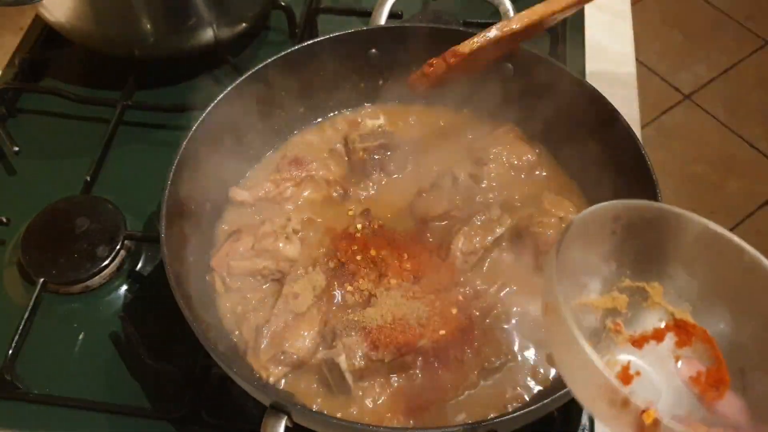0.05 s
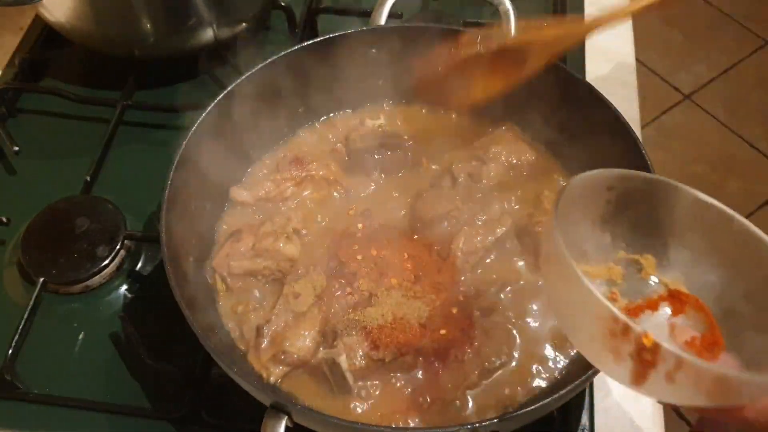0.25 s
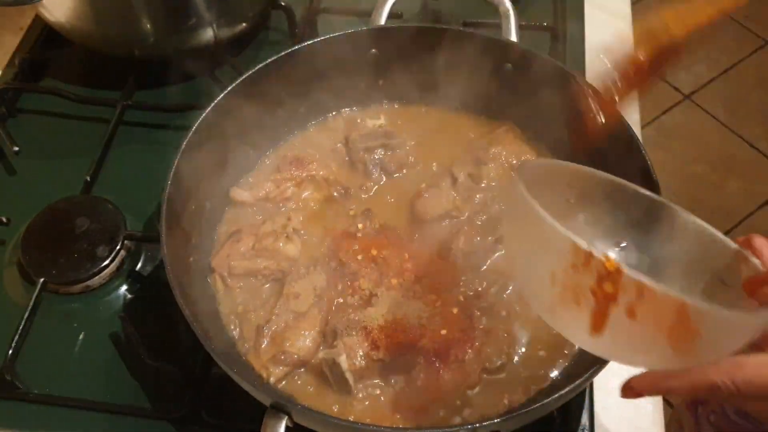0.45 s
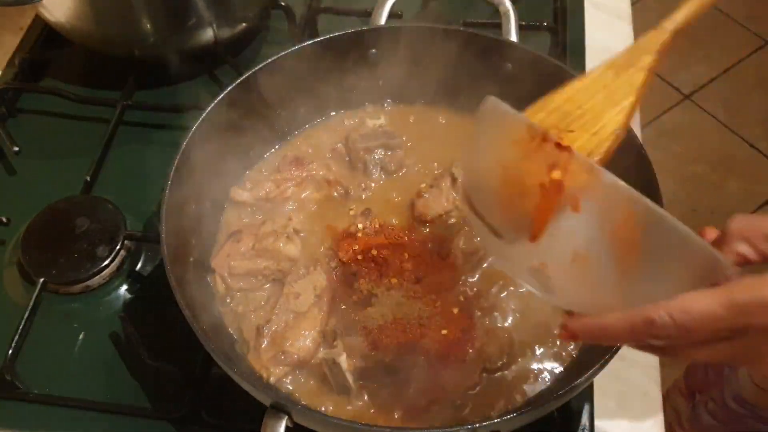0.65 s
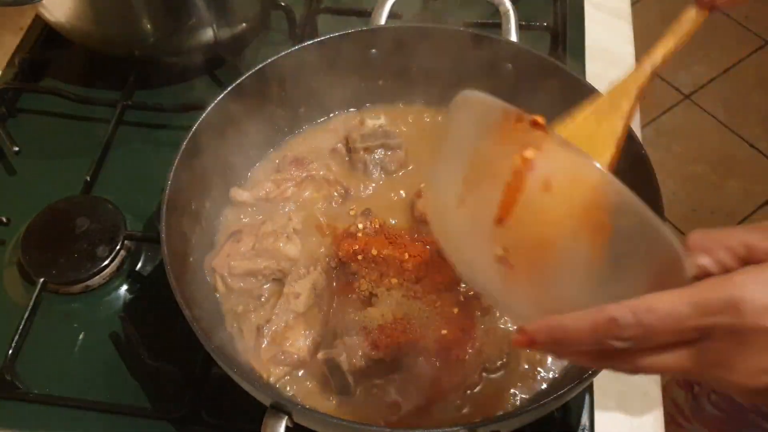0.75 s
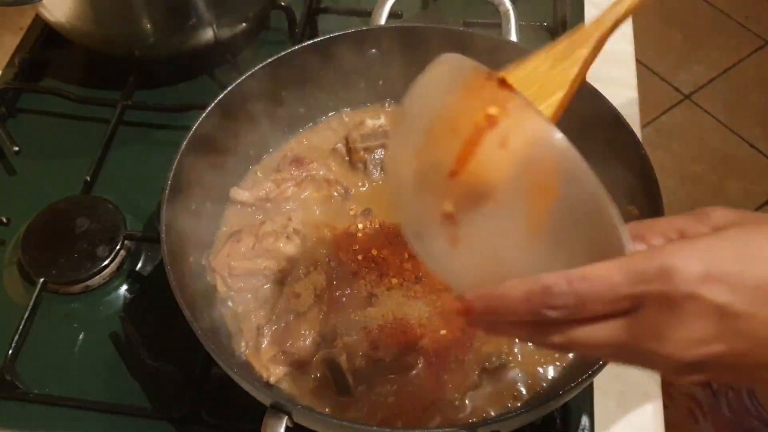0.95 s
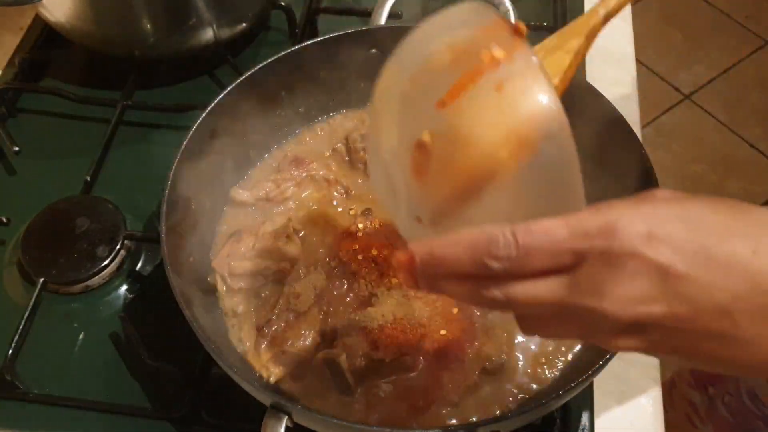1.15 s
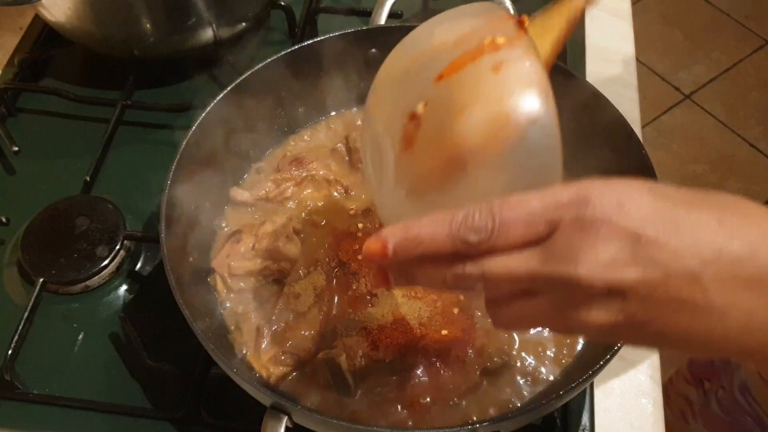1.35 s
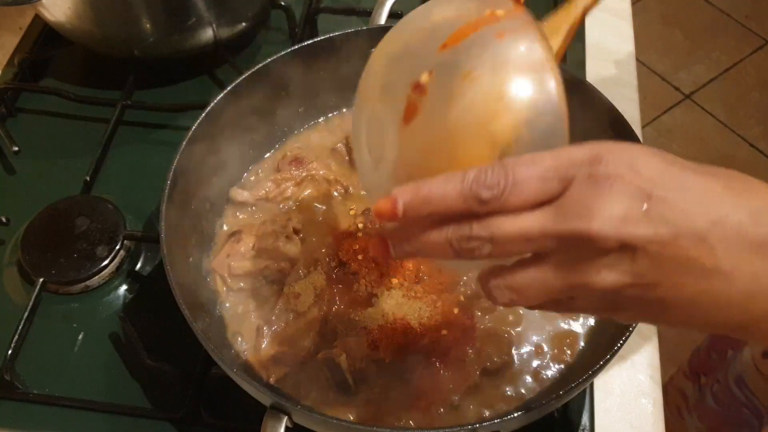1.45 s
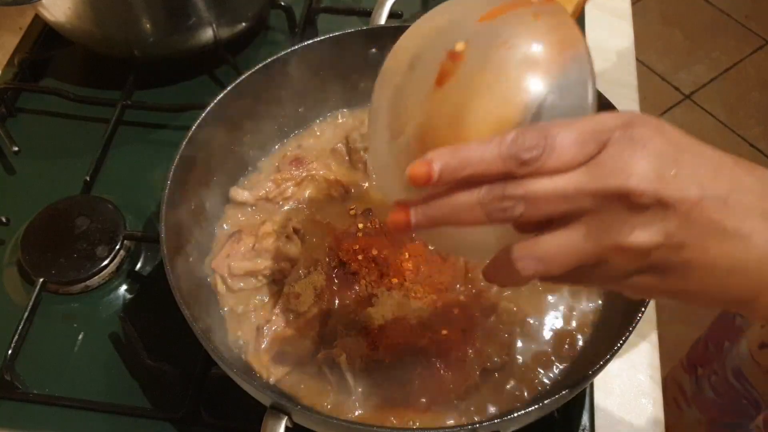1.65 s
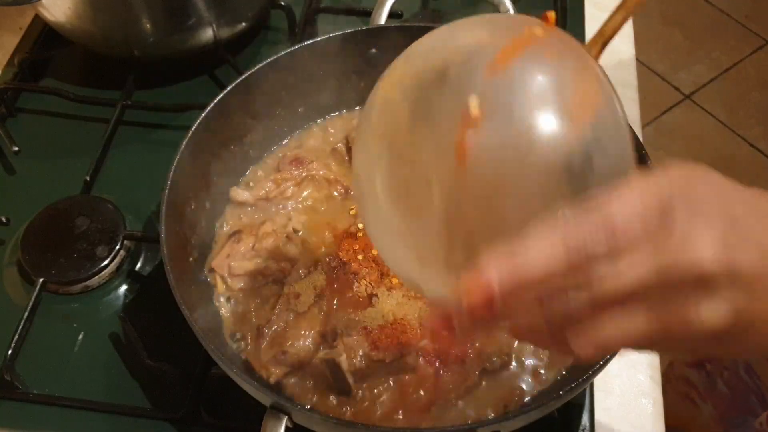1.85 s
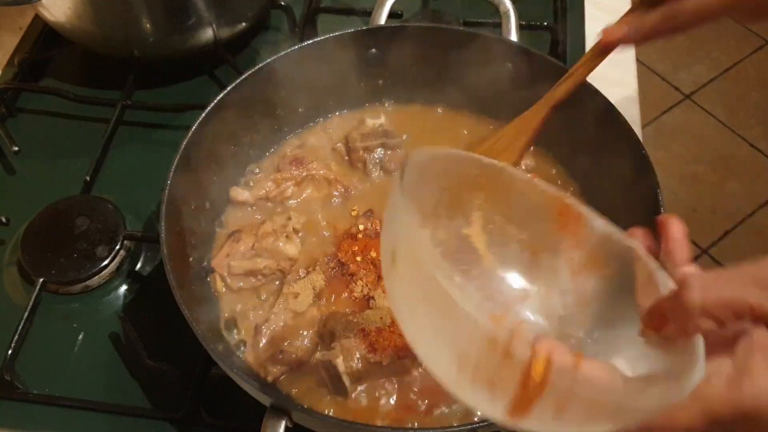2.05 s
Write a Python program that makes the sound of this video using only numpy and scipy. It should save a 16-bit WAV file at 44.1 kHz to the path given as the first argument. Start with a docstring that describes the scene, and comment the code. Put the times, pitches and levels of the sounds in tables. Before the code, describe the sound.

A loud, sharp knock on a steel wok's rim at 0.2 s chatters in quick contacts, rings for about a quarter second and booms low through the hob, with faint rocking until 0.4 s. From 0.4 to 2.1 s a wooden spoon gives short dull taps in a plastic bowl, strongest around 0.9-1.2 s, with faint scrapes. Quiet sizzling, bubbling and tiny fat spits continue throughout, close in a small kitchen.

```python
"""A hard, chattering knock on the rim rings a steel wok and sets it rocking on a gas hob, which booms.
The knock is noise cracks over damped steel modes; each rocking is low modes with a noise boom.
A wooden spoon taps (short modes) and scrapes (noise strokes) in a plastic bowl held over the pan.
Meat and sauce simmer beneath, close by in a small kitchen: coloured noise for sizzle, sauce and burner,
tiny damped tones for crackle and bubbles, and single tones for pops and spits of fat."""
import sys
import numpy as np
from scipy import signal
from scipy.fft import rfft, irfft, next_fast_len
from scipy.io import wavfile
from scipy.ndimage import uniform_filter1d, map_coordinates

SR = 44100
rng = np.random.default_rng(int(sys.argv[2]) if len(sys.argv) > 2 else 0)


def generate_wav(sig):
    """Save sig (samples, or channels by samples) to the path in sys.argv[1] as 16-bit PCM at SR."""
    pcm = np.round(np.clip(np.atleast_2d(sig).T, -1, 1) * 32767).astype(np.int16)
    wavfile.write(sys.argv[1], SR, pcm)


N = 92610  # samples: 2.1 s
TOP_HZ = 15800  # band limit


def amp(db):
    """Decibels to gain."""
    return 10 ** (np.asarray(db) / 20)


def unit(x):
    """Scale to rms 1."""
    return x / np.sqrt(np.mean(x ** 2) + 1e-20)


def along(points, hz):
    """Read a curve of (f/Hz, value) points on a log frequency axis."""
    f, value = np.transpose(points)
    return np.interp(np.log(hz + 1), np.log(f + 1), value)


def since(s):
    """Seconds since a moment, zero before it."""
    return np.maximum(np.arange(N) / SR - s, 0)


def wobble(rate):
    """A smooth random curve with rate knots a second."""
    knots = rng.standard_normal(400)
    return map_coordinates(knots, [np.arange(N) * rate / SR], mode="wrap")


def filtered(x, response):
    """Shape the spectrum of x by a response of frequency."""
    m = next_fast_len(N + SR // 2)  # padded, so the filter does not wrap round
    hz = np.fft.rfftfreq(m, 1 / SR)
    return irfft(rfft(x, m) * response(hz), m)[..., :N]


def noise(spectrum, width):
    """Coloured stereo noise of rms 1; width is side over mid."""
    white = rng.standard_normal((2, N))
    mid, side = filtered(white, lambda hz: amp(along(spectrum, hz)))
    return unit(np.array([mid + width * side, mid - width * side]))


def ring(modes, s, rise_s, width=0):
    """Damped modes of alternating sign struck at s; width (rad) puts the two ears out of step."""
    t = since(s)
    out = np.zeros((2, N))
    ear = np.array([[1], [-1]])
    for k, (hz, db, t60, pan_db) in enumerate(modes):
        sign = (-1) ** k
        level = amp(db - 60 * t / t60) * amp(ear * pan_db / 2)
        out += sign * level * np.sin(2 * np.pi * hz * t + width * ear)
    return out * (1 - np.exp(-t / rise_s))


def grains(per_s, hz, cycles, spread, size_db, rise=0):
    """Random tiny tones, together of rms 1, panned across the pan; each falls 60 dB in its cycles."""
    rows = rng.random((int(per_s * N / SR), 5))
    when, a, b, size, place = rows.T[:, :, None]
    f = np.minimum(hz * np.exp(spread * 2 * (a + b - 1)), TOP_HZ)
    t = np.arange(1200) / SR
    age = np.minimum(f * t / cycles, 3)
    level = amp(-size_db * np.log(1 - .99 * size) - 60 * age)
    tone = level * np.sin(2 * np.pi * f * t * (1 + rise * age))
    at = ((when * N).astype(int) + np.arange(len(t))).ravel()
    pans = np.cos(place * np.pi / 2), np.sin(place * np.pi / 2)
    return unit(np.array([np.bincount(at, (tone * pan).ravel(), N)[:N] for pan in pans]))


def patchy(x, depth_db):
    """Random loud and soft patches, about 1 kHz wide and 20 ms long; the result has rms 1."""
    z = signal.stft(x, nperseg=256)[2]
    field = rng.standard_normal(z.shape[1:])
    field = uniform_filter1d(field, size=6, axis=0)  # across frequency
    field = uniform_filter1d(field, size=7, axis=1)  # along time
    return unit(signal.istft(z * amp(depth_db * unit(field)), nperseg=256)[1][:, :N])


# contacts of the chattering knock (t/s, level/dB)
RIM_CONTACTS = [(0.2086, 2), (0.2104, 2), (.2228, -11.5), (0.2281, -5.5), (0.2384, -5.5)]
# modes of the steel wok (f/Hz, level/dB, t60/s, pan/dB)
WOK_MODES = [(544, -5, .14, 4), (678, -6, .24, 0), (880, 1, .29, -2), (1698, 1, .22, 5), (1892, -6, .18, 0),
             (1972, -6, .18, 0), (2289, -2, .22, -3), (2927, -8, .21, 8), (3371, -16, .18, 2),
             (3694, -17, .18, -4), (4126, -15, .18, 0), (4395, -13, .17, -3), (4827, -19, .25, -2),
             (4873, -22, .3, 0), (5992, -11, .3, -3), (6662, -18, .2, -4), (8053, -20, .2, -3),
             (9068, -28, .2, -3), (10427, -20, .19, -4)]
# noise colour of a contact's crack (f/Hz, level/dB per Hz)
CRACK_COLOUR = [(100, -5), (380, -16), (600, 9), (820, 8.5), (1050, -17), (1650, 5.5), (2000, 6.5),
                (2180, -1), (2400, 11), (2750, -13.5), (3300, -10), (5000, -16), (7500, -7), (8800, -28),
                (15000, -43)]
# noise colour of the clatter of the pan and its grate (f/Hz, level/dB per Hz)
CLATTER_COLOUR = [(100, -2.5), (380, -1.5), (700, -7), (1250, -3), (1500, -7), (2000, -1), (2600, -6),
                  (3400, -10.5), (5000, -12), (7400, -13), (8800, -26.5), (11500, -22.5), (15000, -39)]
WOK_DB, WOK_RISE_S, WOK_WIDTH_RAD = -16.5, 0.012, 0.28
CRACK_DB, CRACK_T60_S = -13.5, 0.033
CLATTER_DB, CLATTER_T60_S = -23.5, 0.3
KNOCK_WET_DB = -9.5  # room on the cracks and clatter


def knock():
    """A chattering blow on the rim: each contact cracks and clatters, and the steel rings on."""
    clash = np.zeros((2, N))
    for s, db in RIM_CONTACTS:
        t = since(s)
        crack = amp(CRACK_DB - 60 * t / CRACK_T60_S) * noise(CRACK_COLOUR, width=0.49)
        clatter = amp(CLATTER_DB - 60 * t / CLATTER_T60_S) * noise(CLATTER_COLOUR, width=0.87)
        clash += amp(db) * (t > 0) * (crack + clatter)
    first_contact_s = RIM_CONTACTS[0][0]
    steel = amp(WOK_DB) * ring(WOK_MODES, first_contact_s, WOK_RISE_S, WOK_WIDTH_RAD)
    return clash + steel + amp(KNOCK_WET_DB) * kitchen(clash)


# the wok comes down on its support (t/s, level/dB, brightness/dB per octave)
ROCKINGS = [(0.2224, -12, 1.5), (0.339, -31, 4), (0.371, -33.5, 3)]
# modes of the hob under the wok (f/Hz, level/dB, t60/s, pan/dB), before the brightness tilt
HOB_MODES = [(57.93, -0.5, 0.31, -1.5), (99.3, -5, 0.19, 3), (114.5, -4.5, 0.34, 3),
             (172, -10.5, 0.193, -3), (206.6, -10, 0.21, -6), (232, -16.5, 0.22, -4)]
# noise colour of the hob's boom (f/Hz, level/dB per Hz)
BOOM_COLOUR = [(25, -29.5), (50, -12), (100, 7.5), (220, -12), (300, -20), (400, -15), (700, -43),
               (2000, -60)]
BOOM_DB, BOOM_T60_S, HOB_RISE_S = -9.5, 0.31, 0.013


def hob():
    """The wok rocks on its support and the hob booms each time: low modes over a dying rumble."""
    out = np.zeros((2, N))
    lowest_hz = HOB_MODES[0][0]
    for s, db, bright_db in ROCKINGS:
        t = since(s)
        modes = [(hz, level + bright_db * np.log2(hz / lowest_hz), t60, pan)
                 for hz, level, t60, pan in HOB_MODES]
        swell = amp(BOOM_DB - 60 * t / BOOM_T60_S) * (1 - np.exp(-t / HOB_RISE_S))
        boom = swell * noise(BOOM_COLOUR, width=0.2)
        out += amp(db) * (ring(modes, s, HOB_RISE_S, width=0.133) + boom)
    return out


# spoon taps (t/s, bowl level/dB, contact f/Hz, contact level/dB, pan/dB)
SPOON_TAPS = [(.436, -30.5, 976, -44, 3), (0.6723, -25.5, 2380, -27, -3), (0.926, -22.5, 2507, -14, -1.5),
              (1.039, -21, 1470, -22, 0.5), (1.1545, -21.5, 1743, -27, 0), (1.396, -38, 2610, -31.5, 4),
              (1.4236, -29, 1276, -32, 0), (1.6723, -27, 1780, -40.5, 1.5), (2.0846, -42, 2150, -35, -8.5)]
# modes of the plastic bowl (f/Hz, level/dB, t60/s)
BOWL_MODES = [(472, -13.5, 0.023), (725.6, -6, 0.014), (894, -3, 0.016), (1080, -3, 0.017),
              (1336, -8.5, 0.014)]
# ring of the contact (ratio to the contact f, level/dB, t60/s)
CONTACT_MODES = [(.8, -3, 0.0053), (.92, 8.5, 0.0053), (1.06, -7.5, 0.021), (1.21, -2.5, 0.018),
                 (1.5, -19, 0.0099)]
# spoon scrapes (centre t/s, length/s, level/dB)
SPOON_SCRAPES = [(0.936, 0.048, -44.5), (1.058, 0.023, -44), (1.485, 0.038, -47.5), (1.684, 0.013, -50),
                 (2.033, 0.031, -47), (2.086, 0.051, -42.5)]
# noise colour of a scrape (f/Hz, level/dB per Hz)
SCRAPE_COLOUR = [(60, 0), (110, 6), (250, -4), (600, 3), (1200, -0.5), (2600, -7), (4000, -19),
                 (12000, -29)]
SPOON_HZ, SPOON_RING_DB, SPOON_T60_S = 2875, -22, .11  # ring level relative to the contact
TAP_RISE_S = 0.00059
TAP_SOFT_RATIO = 1.95  # a tap is dull above this multiple of its contact pitch
TAP_WET_DB = -4  # room on the taps, pops and spits


def spoon():
    """Wood on plastic: short dull taps of bowl, contact and spoon modes, and soft noise scrapes."""
    out = np.zeros((2, N))
    for s, body_db, hz, contact_db, pan_db in SPOON_TAPS:
        modes = [(f, db + body_db, t60, pan_db) for f, db, t60 in BOWL_MODES]
        modes += [(ratio * hz, db + contact_db, t60, pan_db) for ratio, db, t60 in CONTACT_MODES]
        modes += [(SPOON_HZ, SPOON_RING_DB + contact_db, SPOON_T60_S, pan_db)]
        soft = signal.butter(5, min(TAP_SOFT_RATIO * hz, TOP_HZ), fs=SR, output="sos")
        tap = signal.sosfilt(soft, ring(modes, s, TAP_RISE_S, width=0.37))
        out += tap + amp(TAP_WET_DB) * kitchen(tap)
    stroke = np.zeros(N)
    for s, length, db in SPOON_SCRAPES:
        stroke += amp(db) * np.exp(-(2 * (np.arange(N) / SR - s) / length) ** 2)
    return out + stroke * noise(SCRAPE_COLOUR, width=0.47)


# larger bubbles bursting in the sauce (t/s, starting f/Hz, level/dB)
SAUCE_POPS = [(.499, 715, -40), (.745, 650, -43), (1.026, 860, -43), (1.212, 862, -44), (1.312, 1130, -42),
              (1.855, 676, -40), (1.952, 510, -50.5)]
# fat spitting (t/s, f/Hz, level/dB)
FAT_SPITS = [(0.501, 6040, -39), (1.317, 6000, -41), (1.3797, 6000, -38), (1.9254, 7290, -31.5)]
POP_T60_S, POP_RISE_PER_S = 0.034, 3.4  # pitch rise as a fraction of the starting pitch
POP_FILM_RATIO, POP_FILM_DB = 2.3, -5  # the film's overtone, relative to the bubble's note
SPIT_T60_S = 0.0035


def bursts():
    """Single bubbles pop with a rising note and a snap of their film; drops of fat spit a short tone."""
    out = np.zeros(N)
    for s, hz, db in SAUCE_POPS:
        t = since(s)
        phase = 2 * np.pi * hz * t * (1 + POP_RISE_PER_S * t / 2)
        film = amp(POP_FILM_DB) * np.sin(POP_FILM_RATIO * phase)
        out += amp(db - 60 * t / POP_T60_S) * (np.sin(phase) + film)
    for s, hz, db in FAT_SPITS:
        t = since(s)
        out += amp(db - 60 * t / SPIT_T60_S) * np.sin(2 * np.pi * hz * t)
    return out + amp(TAP_WET_DB) * kitchen(out[None])


# noise colours of sizzling fat, seething sauce and gas burner (f/Hz, level/dB per Hz)
SIZZLE_COLOUR = [(300, -58), (1200, 6.5), (2500, -2), (3600, 0.5), (5500, -0.5), (7400, 2), (8500, -11.5),
                 (11500, -10), (15500, -14.5)]
SAUCE_COLOUR = [(100, -25), (230, -4.5), (500, 6), (750, 3), (1100, -4.5), (1600, -6.5), (3000, -5),
                (8000, -72)]
BURNER_COLOUR = [(20, -46), (36, 2), (55, 0), (80, -8.5), (120, 3.5), (160, -13), (300, -17.5),
                 (1000, -102)]
SIZZLE_DB, SIZZLE_FLUTTER_DB, SIZZLE_PATCHY_DB = -52, .5, 3
SAUCE_DB, SAUCE_SWELL_DB = -53, 1.4
BURNER_DB = -56
CRACKLE_PER_S, CRACKLE_HZ, CRACKLE_DB = 760, 5440, -59
BUBBLE_PER_S, BUBBLE_HZ, BUBBLE_DB, BUBBLE_RISE = 70, 945, -55, 0.067


def simmer():
    """Fat sizzles and crackles, the sauce seethes and bubbles, the burner rumbles: noises and grains."""
    flutter = amp(SIZZLE_DB + SIZZLE_FLUTTER_DB * wobble(25.16))
    sizzle = flutter * patchy(noise(SIZZLE_COLOUR, width=0.94), SIZZLE_PATCHY_DB)
    crackle = amp(CRACKLE_DB) * grains(CRACKLE_PER_S, CRACKLE_HZ, cycles=12, spread=0.29, size_db=3.0)
    sauce = amp(SAUCE_DB + SAUCE_SWELL_DB * wobble(25)) * noise(SAUCE_COLOUR, width=0.48)
    bubbles = amp(BUBBLE_DB) * grains(BUBBLE_PER_S, BUBBLE_HZ, cycles=6.8, spread=0.648,
                                      size_db=-0.5, rise=BUBBLE_RISE)
    burner = amp(BURNER_DB + 0.4 * wobble(5)) * noise(BURNER_COLOUR, width=0.139)
    return sizzle + crackle + sauce + bubbles + burner


# reverberation of the small kitchen (f/Hz, t60/s)
ROOM_DECAY = [(100, 1), (500, 0.56), (2500, 0.2), (10000, 0.325)]


def kitchen(x):
    """The room's answer: a stereo noise tail, each frequency dying at its own speed."""
    hz, t, z = signal.stft(rng.standard_normal((2, SR // 2)), SR, nperseg=256)
    decay = amp(-60 * t / along(ROOM_DECAY, hz)[:, None])
    tail = signal.istft(z * decay, SR, nperseg=256)[1]
    tail = tail + .35 * tail[::-1]  # the two sides share some of the tail
    tail = np.pad(tail, ((0, 0), (SR // 500, 0)))  # 2 ms before the room answers
    tail = tail / np.linalg.norm(tail[0])
    return signal.fftconvolve(x.mean(0)[None], tail, axes=1)[:, :N]


# drift of the simmer (t/s, level/dB)
SIMMER_HEAT = [(0, -0.5), (.5, 0), (1.1, 0), (1.5, .5), (1.95, 0)]


def scene():
    """Everything at the stove; only the simmer follows the heat."""
    heat = amp(np.interp(np.arange(N) / SR, *np.transpose(SIMMER_HEAT)))
    return knock() + hob() + spoon() + bursts() + heat * simmer()


# how much the two close microphones differ (f/Hz, side level/dB)
MIC_SPREAD = [(60, 1.5), (250, -5.5), (600, -1.5), (1200, 2.5), (3000, 2.5), (12000, 1.5)]
# balance of the microphones (f/Hz, left minus right level/dB)
MIC_LEAN = [(60, -1.5), (120, -1.5), (350, -0.5), (900, -2.5), (1700, -1.5), (3000, -1), (4400, -1.5),
            (8000, -8.5), (15000, -3)]
LOW_CUT_HZ = 48.6


def record(dry):
    """Two close microphones, the right one brighter; deep bass and all above the band limit are cut."""
    mid = (dry[0] + dry[1]) / 2
    side = filtered((dry[0] - dry[1]) / 2, lambda hz: amp(along(MIC_SPREAD, hz)))
    pair = np.array([mid + side, mid - side])

    def response(hz):
        """Left-right balance, steep low cut and band limit."""
        balance = amp(along(MIC_LEAN, hz) * np.array([[.5], [-.5]]))
        low_cut = 1 / np.sqrt(1 + (LOW_CUT_HZ / (hz + 1)) ** 12)
        return balance * low_cut * (hz < TOP_HZ)

    return filtered(pair, response)


dry = scene()
out = record(dry)
generate_wav(out)
```